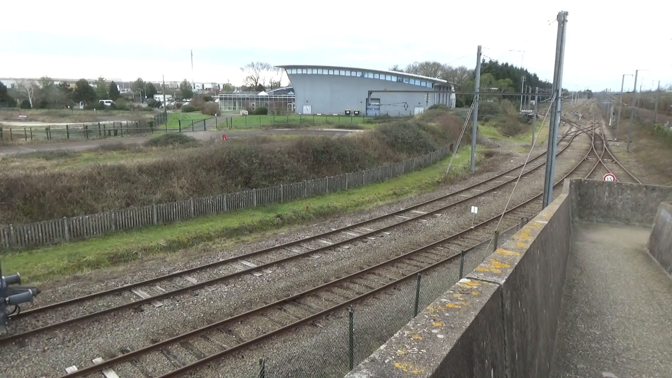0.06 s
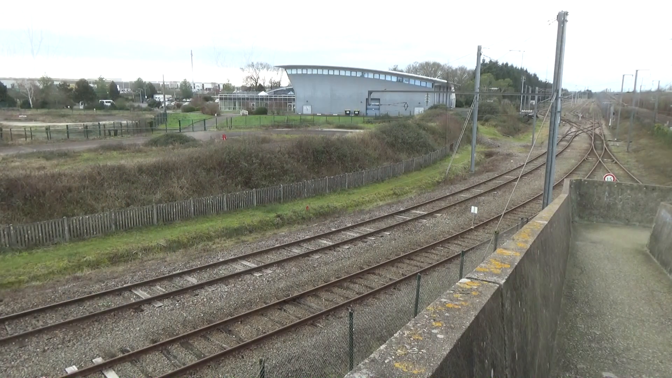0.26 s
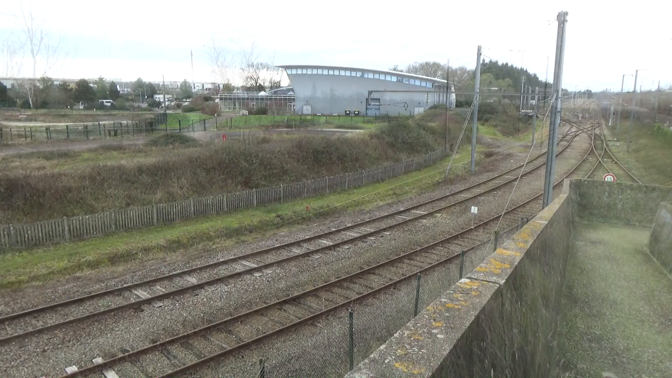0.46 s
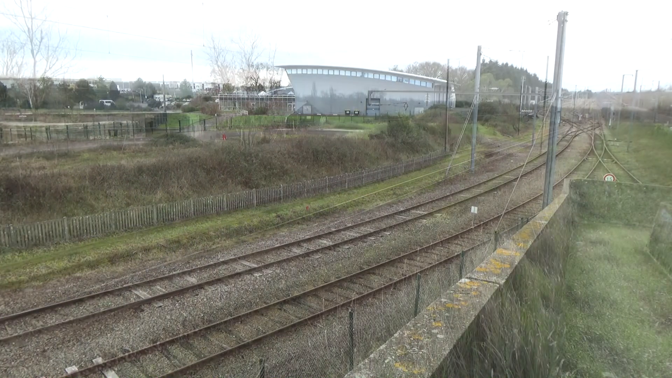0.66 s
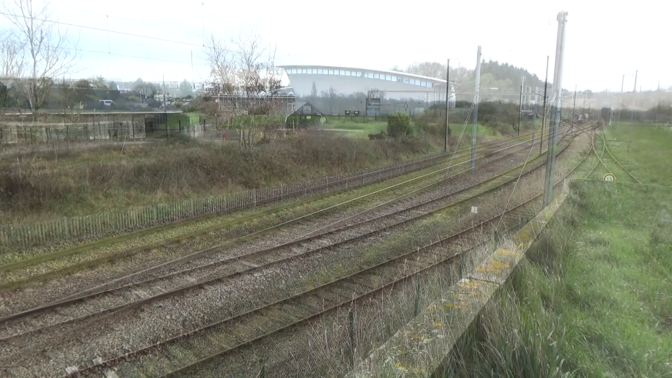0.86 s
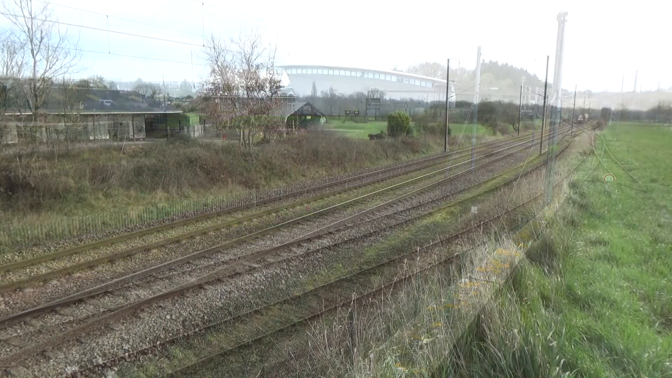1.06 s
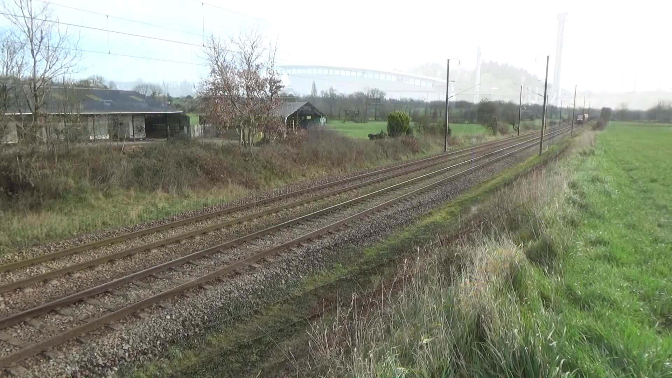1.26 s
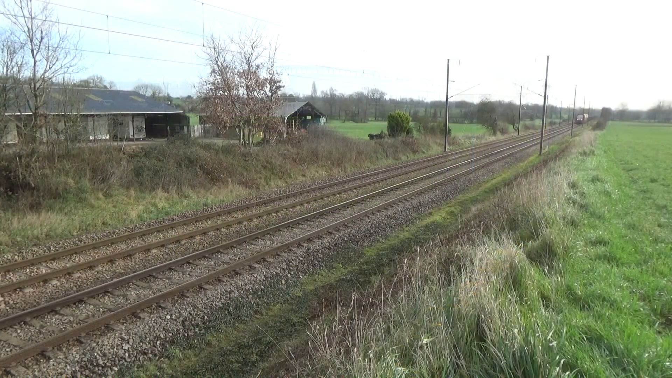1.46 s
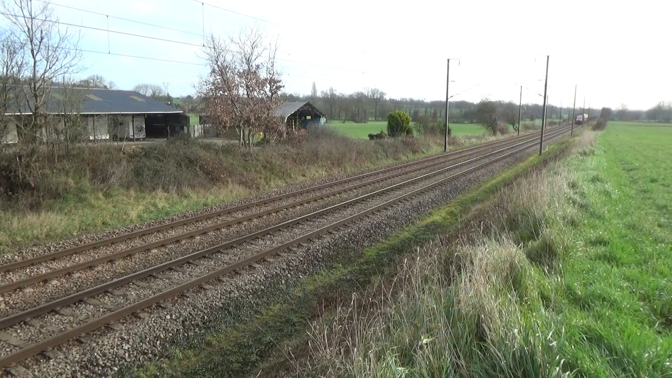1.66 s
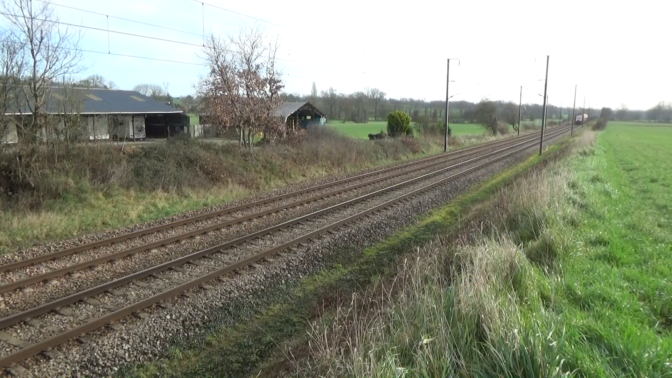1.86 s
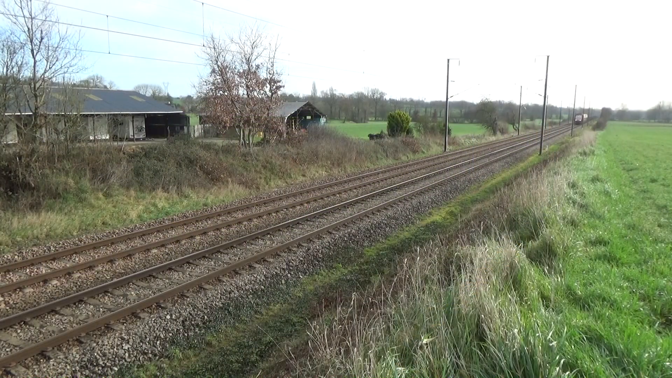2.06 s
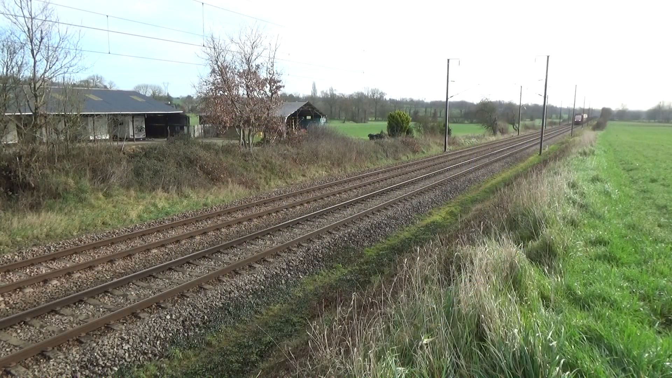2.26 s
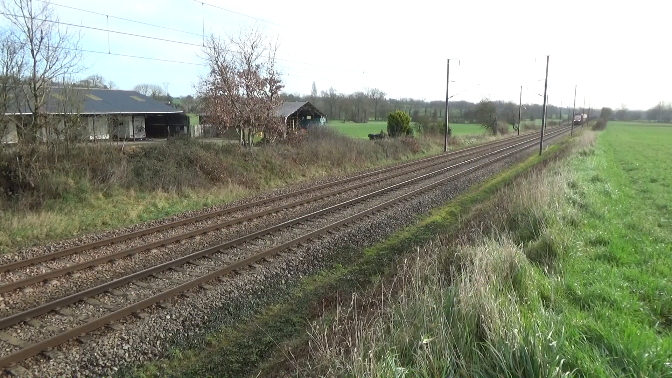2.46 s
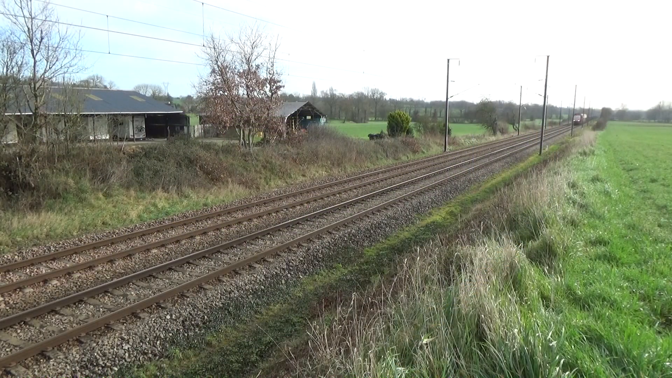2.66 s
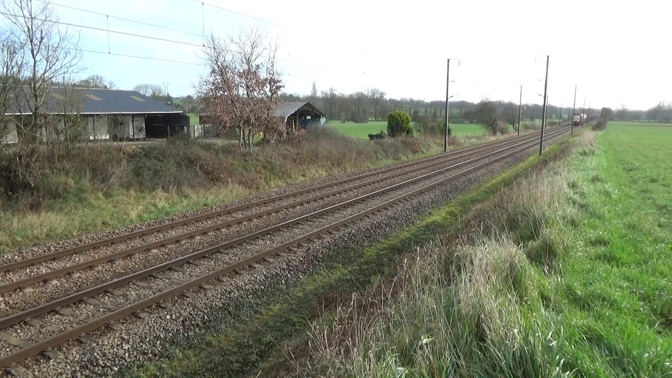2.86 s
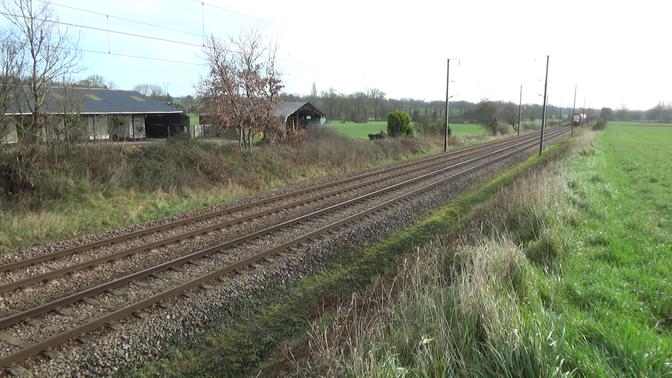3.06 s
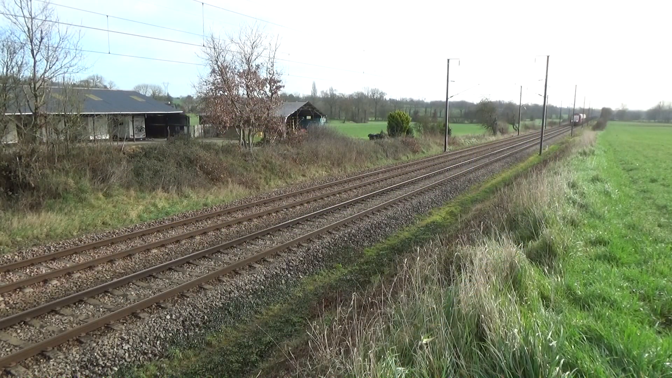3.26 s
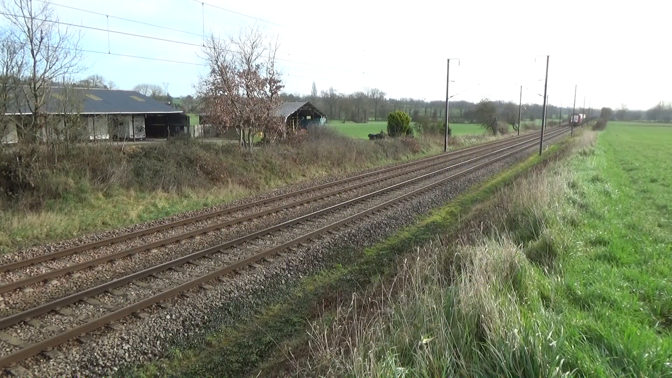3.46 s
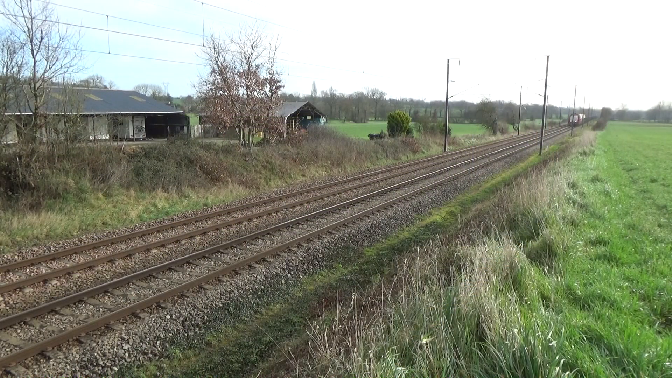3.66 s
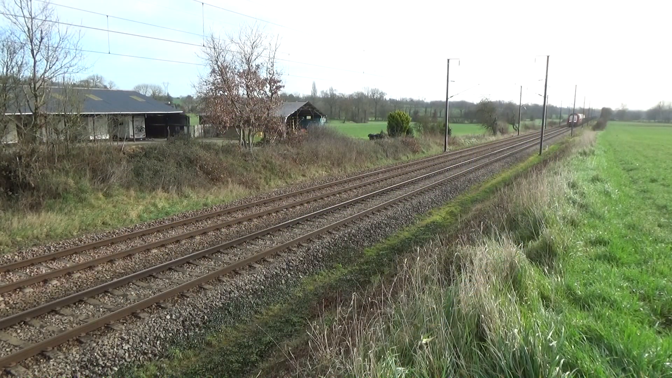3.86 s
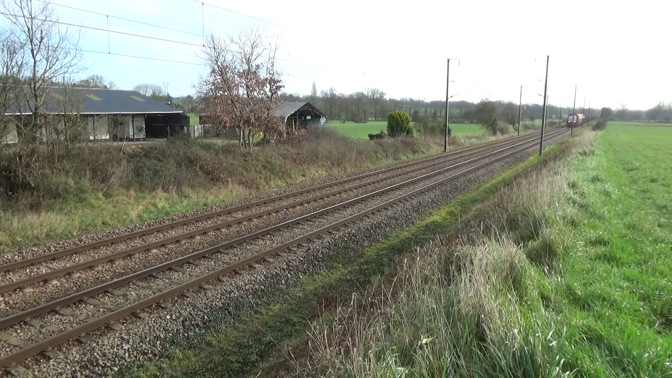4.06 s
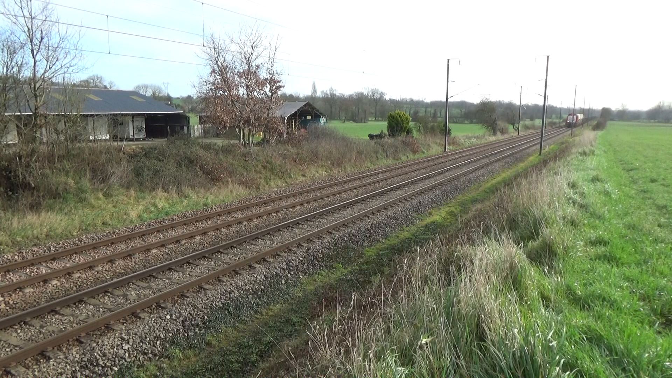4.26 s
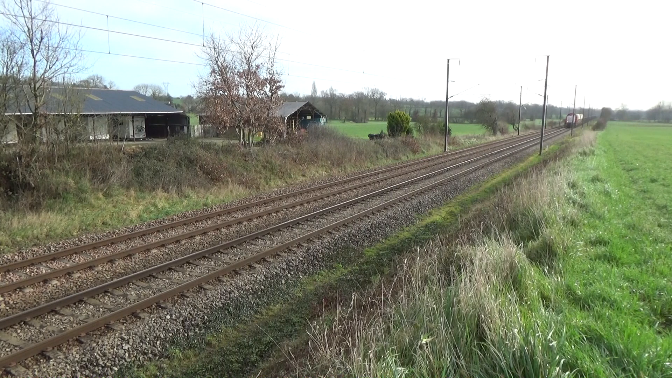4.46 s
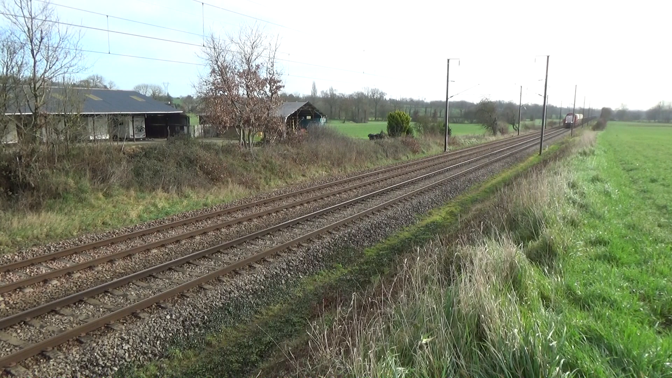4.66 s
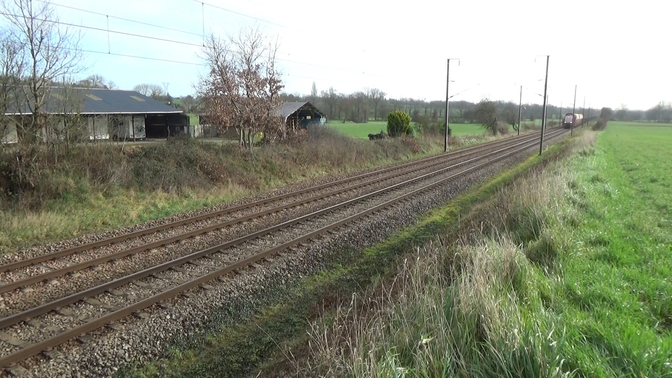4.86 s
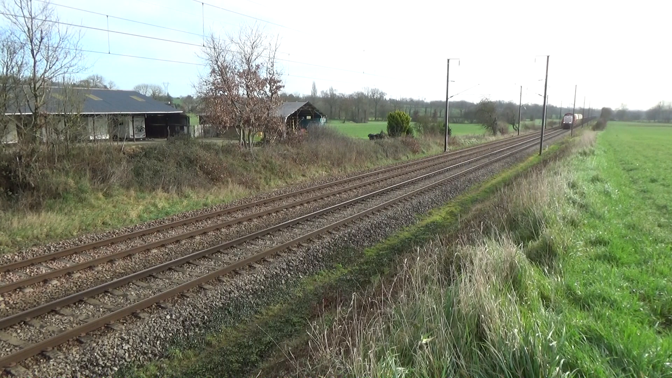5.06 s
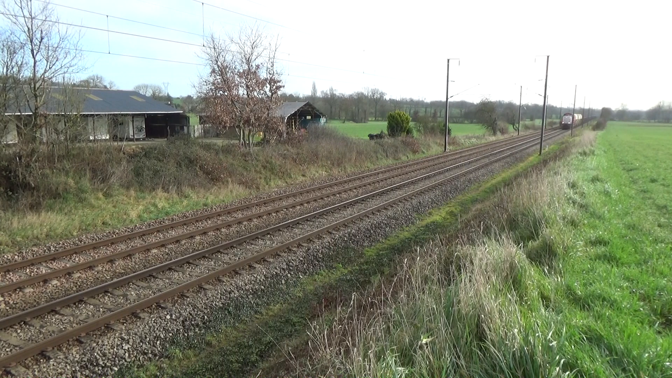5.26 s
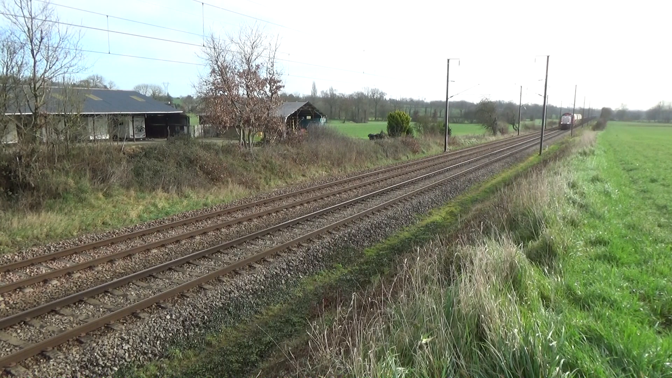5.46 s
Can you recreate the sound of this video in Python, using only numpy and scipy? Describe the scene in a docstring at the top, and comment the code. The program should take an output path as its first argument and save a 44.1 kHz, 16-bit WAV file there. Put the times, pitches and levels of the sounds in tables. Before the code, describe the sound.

An electric locomotive is passing close by from the start, loud and a little to the left. Its deep rumble and wheel roar carry a gritty hiss, a steady low motor hum and a high, slightly wavering whine. From about 0.5 seconds it fades smoothly, and by 1.9 seconds it has given way to the much quieter low rumble and air of open fields. Between 2 and 2.5 seconds a distant small bird gives three faint, thin whistles, with another near 3.7 seconds. Dry stalks tick lightly in the grass from about 3 to 5.4 seconds, most clearly at 3.1 seconds. Meanwhile a far train slowly grows louder, with a low engine throb and a thin, shimmering hiss in the rails. Its rolling wheels come in soft swells from around 3.9 seconds, and it is still distant at the end, near 5.5 seconds.

```python
"""Close locomotive, then open fields

An electric locomotive rolls past on the left: body rumble, wheel roar, motor hum and a high gear whine.
It dissolves into a quiet stretch of line in open fields, where a far train approaches with a low engine
throb and its wheels set the rails singing. Small birds whistle and dry stalks tick in the grass."""
import sys
import numpy as np
from scipy import signal
from scipy.fft import rfft, irfft, next_fast_len
from scipy.io import wavfile
from scipy.ndimage import uniform_filter1d

SR = 44100
rng = np.random.default_rng(int(sys.argv[2]) if len(sys.argv) > 2 else 0)


def store_wav(level_fs):
    """Save 16-bit WAV to argv[1]."""
    pcm = np.round(np.clip(np.atleast_2d(level_fs), -1, 1) * 32767)
    wavfile.write(sys.argv[1], SR, pcm.T.astype(np.int16))


N = 243873
T = np.arange(N) / SR
HZ = np.fft.rfftfreq(N, 1 / SR)
FADE_START_S, GONE_S = 0.5, 1.855  # the fields come in, the locomotive is gone

# stereo width of the distant noise: (frequency [Hz], left-right likeness [0-1])
FAR_LIKENESS = [(180, 1), (290, .98), (640, .86), (1400, .66), (3100, .7), (6800, .78), (9000, .88),
                (12000, .985)]
# its stereo balance: (frequency [Hz], left minus right [dB])
FAR_BALANCE = [(300, 0), (700, 2.4), (1200, 2.6), (2200, -.6), (5200, -.6), (6800, 3.5), (7800, 2.5),
               (8800, 0)]


def gain_of(db):
    """Decibels to gain."""
    return 10 ** (np.asarray(db) / 20)


def unit_rms(x):
    """Scales to rms 1."""
    return x / np.sqrt(np.mean(abs(x) ** 2) + 1e-20)


def curve(points):
    """Spreads (frequency [Hz], value) points over the spectrum on a log-frequency axis."""
    hz, value = np.transpose(points)
    return np.interp(np.log(HZ + 1), np.log(hz + 1), value)


def swells(rows):
    """Level in dB over time: one smooth bell for each swell or dip."""
    return sum(db * np.exp(-(2 * (T - middle) / length) ** 2) for middle, length, db in rows)


def band(x, lo_hz, hi_hz):
    """One steep-sided band of a sound, at rms 1."""
    passband = 1 / (1 + (lo_hz / (HZ + 1)) ** 16) / (1 + (HZ / hi_hz) ** 16)
    return unit_rms(irfft(rfft(x) * passband, N))


def stereo(a, b, likeness, left_db):
    """Two unrelated signals become a left and a right of given likeness and balance."""
    right = likeness * a + np.sqrt(1 - likeness ** 2) * b
    return np.array([a * gain_of(left_db / 2), right * gain_of(-left_db / 2)])


def noise(colour, likeness, balance, patchy_db):
    """Coloured stereo noise at rms 1, whose level drifts in patches of time and frequency."""
    a, b = rfft(rng.standard_normal((2, N)))
    even = irfft(stereo(a, b, curve(likeness), curve(balance)) * gain_of(curve(colour)), N)
    frames = signal.stft(even, nperseg=2048)[2]
    patches = uniform_filter1d(rng.standard_normal(frames.shape[1:]), size=18, axis=0)
    patches = unit_rms(uniform_filter1d(patches, size=5, axis=1))
    return unit_rms(signal.istft(frames * gain_of(patchy_db * patches), nperseg=2048)[1][:, :N])


def drift(rate_hz):
    """A random wobble of rms 1, moving at up to about the given rate."""
    return unit_rms(irfft(rfft(rng.standard_normal(N)) * np.exp(-(HZ / rate_hz) ** 2), N))


def tone(hz, width_hz, steady, likeness, left_db):
    """A stereo tone: a core with the steady share of the power, inside a fluttering skirt."""
    offset_hz = np.fft.fftfreq(next_fast_len(N), 1 / SR)
    skirt = np.exp(-(offset_hz / width_hz) ** 2 + 2j * np.pi * rng.random((2, len(offset_hz))))
    a, b = unit_rms(np.fft.ifft(skirt)[:, :N])
    sides = stereo(np.sqrt(steady) + np.sqrt(1 - steady) * a, b, likeness, left_db)
    carrier = np.exp(2j * np.pi * np.cumsum(hz * np.ones(N)) / SR)
    return unit_rms((sides * carrier).real)


def wheel_roar():
    """Close wheels shake the body and the rails; the deep rumble sinks fastest as they draw away."""
    # colour of the roar: (frequency [Hz], level [dB])
    colour = [(15, -27), (45, -7), (100, -6), (155, -2.5), (225, 0), (330, -6), (400, -8), (700, -9),
              (1950, -19.5), (2750, -21), (3200, -23), (6500, -28), (8200, -33.5), (11000, -39),
              (14000, -52)]
    # stereo width: (frequency [Hz], left-right likeness [0-1])
    likeness = [(60, 0.19), (130, 0.51), (290, 0.98), (640, 0.41), (1400, 0.46), (2800, 0.93), (6800, 0.41),
                (12000, 0.77)]
    # stereo balance: (frequency [Hz], left minus right [dB])
    balance = [(60, -.5), (200, 1), (380, 3.5), (700, 6.5), (2400, 6.2), (4400, 7.5), (6500, 4),
               (9000, -1.5), (15000, 0)]
    # how far the right side leads: (frequency [Hz], phase [rad])
    right_lead = [(500, 0), (1000, 0.43), (5500, 0.64), (9000, 0)]
    # the wheel noise swells and slackens: (middle [s], length [s], level [dB])
    surges = [(.09, 0.18, 3), (.3, 0.077, 2.5), (.37, 0.038, -3.5), (1.27, 0.17, 2)]
    roar = noise(colour, likeness, balance, patchy_db=0.87)
    roar[1] = irfft(rfft(roar[1]) * np.exp(1j * curve(right_lead)), N)
    surge_db = swells(surges)
    grit = gain_of(1.1 * drift(59))  # rough treads make the hiss flutter
    rumble = gain_of(-24.3 - 4 * T) * band(roar, 15, 157.5)
    body = gain_of(-18.5 - 2 * T) * band(roar, 172, 486)
    wheels = gain_of(-23.5 - 0.02 * T + surge_db) * band(roar, 482, 1750)
    hiss = gain_of(-29.5 - T + surge_db) * grit * band(roar, 1760, 16400)
    return rumble + body + wheels + hiss


def motor_hum(doppler):
    """Motors and blowers hum in a cluster of low tones that slowly fades."""
    # hum tones: (frequency [Hz], relative level [dB], width [Hz])
    partials = [(187, -29.5, 18), (225, -27.5, 6), (257, -32, 8), (305, -36, 8), (350.5, -32, 3),
                (427, -40, 6), (503, -38, 6), (895, -40.5, 9)]
    hum = sum(gain_of(db) * tone(hz * doppler, width, steady=.72, likeness=.64, left_db=1.8)
              for hz, db, width in partials)
    return gain_of(1.8 - 2.3 * T) * hum


def gear_whine(doppler, from_middle_s):
    """Gears and traction converter whine on the left, each tone wavering slightly in pitch."""
    # whine tones, some fading as the source turns:
    # (frequency [Hz], relative level [dB], width [Hz], level slope [dB/s])
    partials = [(1579, -52, 6, 0), (1797, -50, 6, 0), (1862, -51, 9, 0), (2208, -50, 8, 0),
                (2708, -53, 12, 0), (3160, -51, 16, 0), (3293, -55, 9, 0), (3715, -43.5, 30, -1.5),
                (4069, -49.5, 24, -5), (4416, -51, 20, 0), (4768, -53.5, 16, 0), (5560, -61, 14, 0),
                (7431, -52, 50, -3), (9280, -57.5, 160, 0)]
    whine = np.zeros((2, N))
    for hz, db, width, slope in partials:
        waver = 1 + .0015 * drift(31.3)
        partial = tone(hz * doppler * waver, width, steady=0.36, likeness=0.49, left_db=12)
        whine += gain_of(db + slope * from_middle_s) * partial
    return gain_of(3.1) * whine


def converter_whistle(doppler):
    """The converter's highest whistle, strongest while the locomotive is abreast."""
    core = tone(14760 * doppler, 70, steady=.05, likeness=1, left_db=0)
    halo = gain_of(-1.5) * tone(14800, 270, steady=0, likeness=1, left_db=0)
    abreast_db = 7 * np.exp(-(T / .22) ** 2)
    return gain_of(-56.5 - 3.5 * T + abreast_db) * (core + halo)


def locomotive():
    """The close pass: its tones sag slightly in pitch as it draws away to the left."""
    from_middle_s = T - GONE_S / 2
    doppler = 1 - .0015 * from_middle_s
    leftward = gain_of(np.outer([.5, -.5], from_middle_s))
    machine = wheel_roar() + motor_hum(doppler) + gear_whine(doppler, from_middle_s)
    return leftward * machine + converter_whistle(doppler)


def fields():
    """An even bed of outdoor rumble and air, with a distant wash that dies away."""
    # colour of the bed: (frequency [Hz], level [dB])
    air_colour = [(12, -40), (20, -9), (49, -1.5), (100, -4), (129, -2.5), (157, -4.5), (219, -9.5),
                  (403, -10.5), (533, -9.5), (595, -11), (1260, -12.5), (3070, -26.5), (4530, -35),
                  (5070, -35.5), (15400, -46.5)]
    # colour of the airy wash: (frequency [Hz], level [dB])
    wash_colour = [(700, -19), (1200, 5), (1800, -0.5), (3500, -26), (6000, -45)]
    air = noise(air_colour, FAR_LIKENESS, FAR_BALANCE, patchy_db=-0.46)
    wash = noise(wash_colour, FAR_LIKENESS, FAR_BALANCE, patchy_db=2.1)
    wash_db = -46.5 - 10 * np.maximum(T - GONE_S, 0)
    return gain_of(-40.5) * air + gain_of(wash_db) * wash


def engine_throb():
    """A distant engine throbs on the low harmonics of its shaft."""
    # engine harmonics: (multiple of the shaft rate, relative level [dB])
    harmonics = [(2, -15), (3, -6.5), (4, -10), (5, -9), (6, -10), (7, -43), (8, 0.5), (9, -9.5)]
    shaft_hz = 16.25
    return sum(gain_of(db) * tone(k * shaft_hz, 3.3, steady=0.79, likeness=0.99, left_db=0)
               for k, db in harmonics)


def far_wheels():
    """The rolling of distant wheels carries across the fields in swells."""
    # colour of the rolling: (frequency [Hz], level [dB])
    colour = [(150, -45), (300, -5.5), (600, -7.5), (900, 2), (1150, -2.5), (1700, -19), (2500, -61),
              (4000, -51)]
    # its swells and dips: (middle [s], length [s], level [dB])
    surges = [(3.89, 0.37, 3), (4.17, 0.12, -2), (4.41, .15, 3.5), (4.75, 0.42, 3), (5.28, 0.42, 3)]
    return gain_of(swells(surges)) * noise(colour, FAR_LIKENESS, FAR_BALANCE, patchy_db=1.8)


def singing_rails():
    """The rails carry the wheels' ring far ahead of the train: a hiss with shimmering high modes."""
    # colour of the rail hiss: (frequency [Hz], level [dB])
    colour = [(1000, 0), (1900, 6.5), (3000, 2), (3800, -0.5), (4600, 0), (5600, -10.5), (6400, 1.5),
              (7200, -4.5), (7800, -9), (8300, -26), (11000, -25), (14000, -40)]
    # high modes of the rails: (frequency [Hz], relative level [dB], width [Hz])
    modes = [(4230, -19, 25), (6322, -20, 10), (6428, -11, 14), (6610, -12, 60), (6950, -13, 60),
             (7292, -12, 26), (7758, -20, 30), (10850, -24, 200)]
    hiss = noise(colour, FAR_LIKENESS, FAR_BALANCE, patchy_db=1.8)
    ring = sum(gain_of(db) * tone(hz, width, steady=0, likeness=0.95, left_db=3.8)
               for hz, db, width in modes)
    return hiss + gain_of(-4.5) * ring


def far_train():
    """Engine, wheels and rails each grow at their own rate as the train comes nearer."""
    nearing_s = T - 4
    throb = gain_of(-48 + 4 * nearing_s) * engine_throb()
    rolling = gain_of(-45 + 1.86 * nearing_s) * far_wheels()
    singing = gain_of(-55 + 4.5 * nearing_s) * singing_rails()
    return throb + rolling + singing


def birds():
    """Thin, trembling whistles from far across the field: each holds its pitch, then slurs down."""
    # whistles: (start [s], length [s], pitch [Hz], final drop [Hz], level [dB])
    notes = [(2.005, .035, 4800, 450, -67), (2.099, 0.18, 4590, 1500, -60), (2.387, .14, 5480, 30, -72),
             (3.71, 0.078, 5300, 80, -69)]
    edge_s, hold_share = .012, 0.42
    tremble = 1 + 0.0065 * drift(270)
    flutter = gain_of(1.6 * drift(90))
    out = np.zeros(N)
    for start, length, hz, drop_hz, db in notes:
        t = T - start
        slur = np.clip((t / length - hold_share) / (1 - hold_share), 0, 1) ** 1.5
        pitch_hz = (hz - drop_hz * slur) * tremble
        envelope = np.clip(np.minimum(t, length - t) / edge_s, 0, 1)
        whistle = unit_rms(np.sin(2 * np.pi * np.cumsum(pitch_hz) / SR))
        out += gain_of(db) * flutter * envelope * whistle
    return out


def stalks():
    """Each tick is a tiny snap that rings a dry stem; many fainter ones rustle between them."""
    # ticks in the grass: (time [s], level [dB], share of ring against plain snap [0-1])
    ticks = [(3.093, -35.5, .65), (3.106, -42, .55), (3.489, -46, .2), (3.754, -67.5, 0), (3.962, -53, .2),
             (4.696, -45, 0.4), (4.786, -46, .2), (5.044, -42, .2)]
    # modes of a dry stem: (frequency [Hz], relative level [dB], time to fall 60 dB [s])
    modes = [(5750, 0, .013), (6150, -3, .01), (6900, -5, .006), (9300, -6, .009)]
    t = np.arange(round(.02 * SR)) / SR
    stem = sum(gain_of(db - 60 * t / t60) * np.sin(2 * np.pi * hz * t) for hz, db, t60 in modes)
    treble = signal.butter(4, [5500, 12500], "band", fs=SR, output="sos")
    faint_ticks = rng.uniform([2.9, -62, 0], [5.4, -53, .5], (24, 3))
    out = np.zeros(N)
    for start, db, share in [*ticks, *faint_ticks]:
        snap = signal.sosfilt(treble, rng.standard_normal(len(t)) * np.exp(-t / 0.0024))
        ring = np.convolve(snap, stem)[:len(t)]
        tick = share * ring / abs(ring).max() + (1 - share) * snap / abs(snap).max()
        at = round(start * SR)
        out[at:at + len(t)] += gain_of(db) * tick
    return out


def scene():
    """The close pass dissolves into the quiet fields in one smooth crossfade."""
    fade = np.pi / 2 * np.clip((T - FADE_START_S) / (GONE_S - FADE_START_S), 0, 1)
    near = abs(np.cos(fade)) ** 0.91 * locomotive()  # a power below 1 lets it linger, then drop away
    far = np.sin(fade) * (fields() + far_train() + birds() + stalks())
    return near + far


def record(dry):
    """A steep low-pass trims the very top of the treble."""
    lowpass = signal.firwin(511, 15600, window=("kaiser", 9), fs=SR)
    return signal.oaconvolve(dry, lowpass[None], "same")


dry = scene()
out = record(dry)
store_wav(out)
```